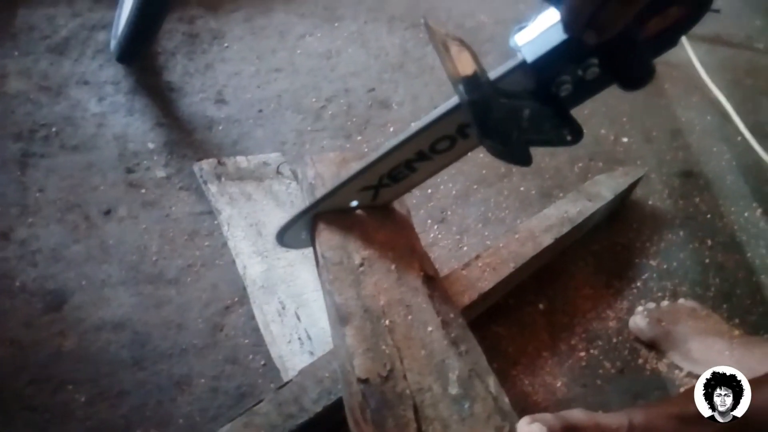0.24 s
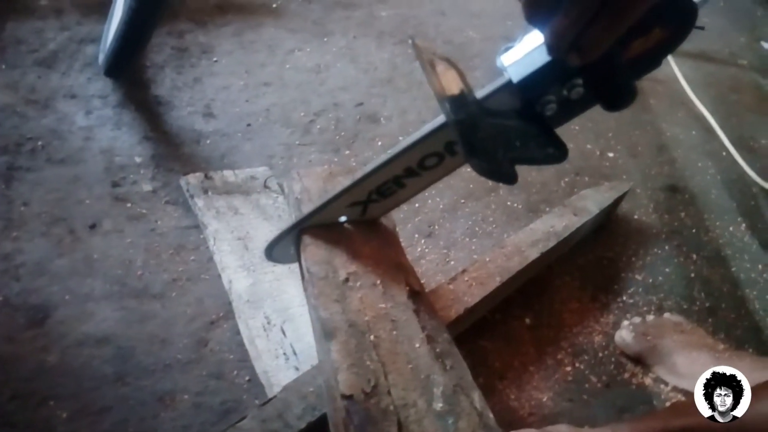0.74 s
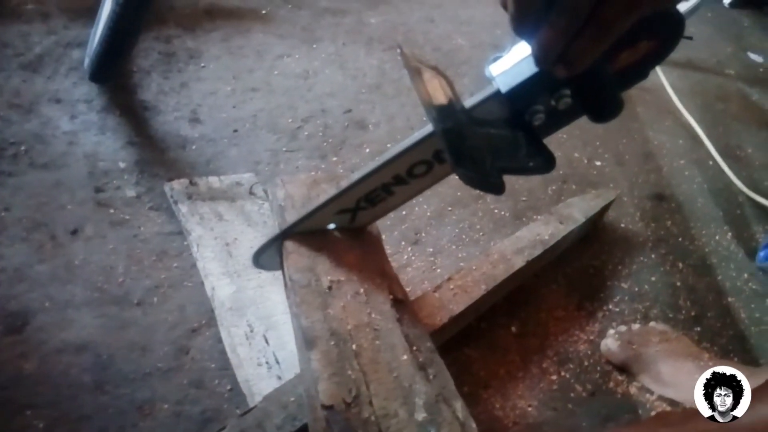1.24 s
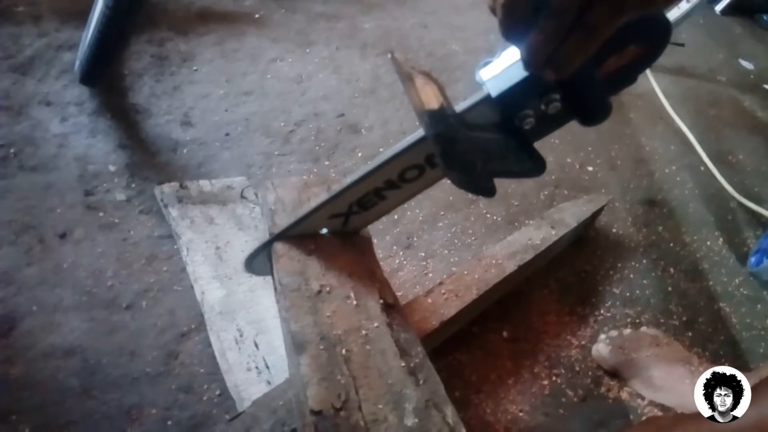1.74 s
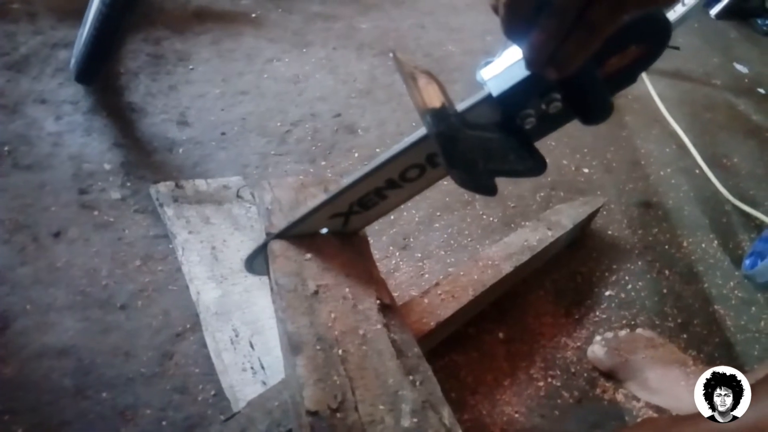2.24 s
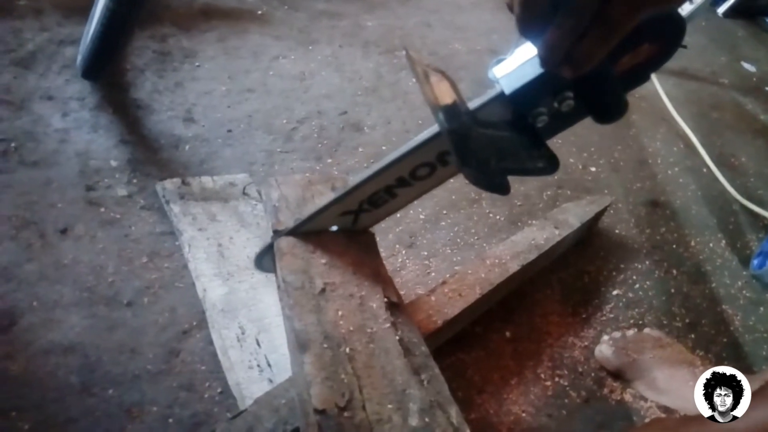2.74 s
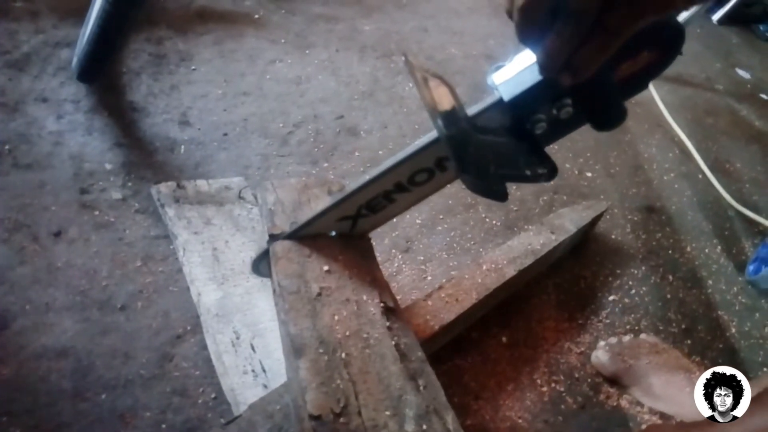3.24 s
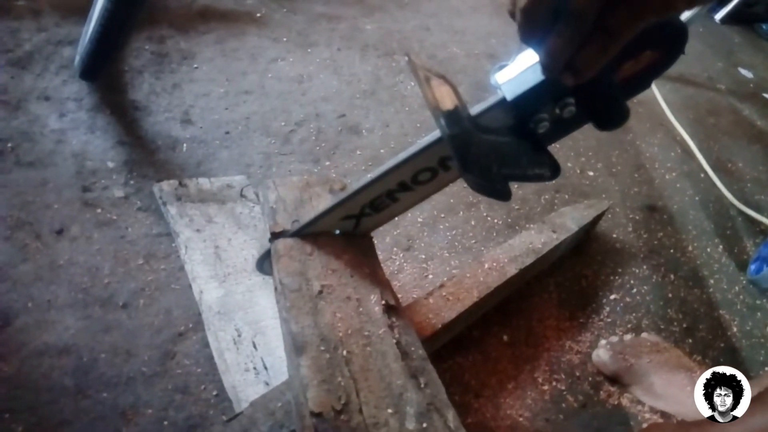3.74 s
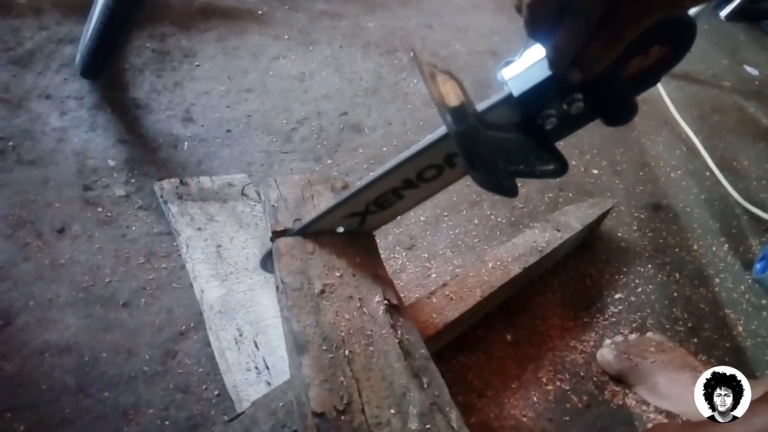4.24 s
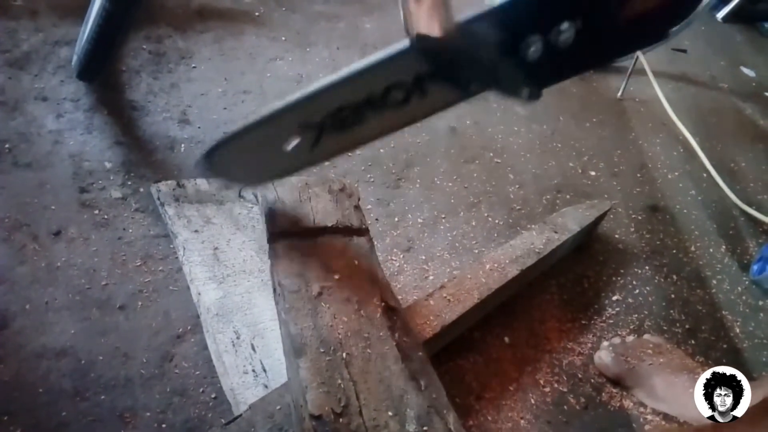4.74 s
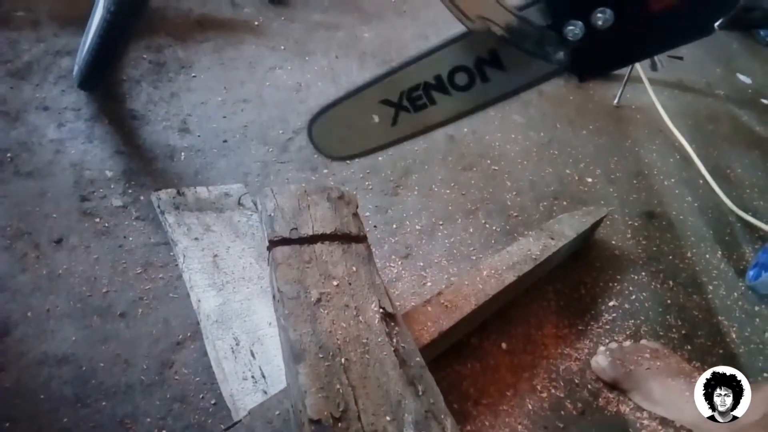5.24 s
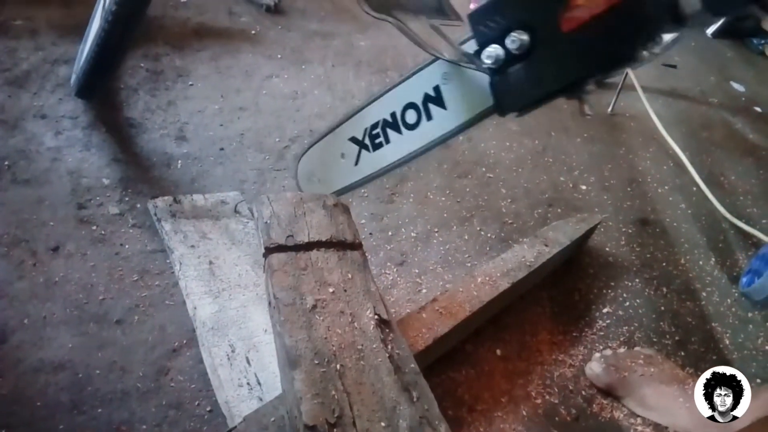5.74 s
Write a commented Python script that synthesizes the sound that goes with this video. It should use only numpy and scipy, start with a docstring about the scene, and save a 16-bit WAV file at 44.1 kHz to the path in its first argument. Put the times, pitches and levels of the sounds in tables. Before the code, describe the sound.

Close stereo pickup in a small hard-floored workshop: a grinder with a short chain bar cuts a wooden beam with a bright, rough, continuous metallic rattle and thin steel ringing. Blown air and sawdust thump on the right microphone. Near the end the saw lifts out, the thumping stops, and it whirs on, slightly faster and with clearer gear whine.

```python
"""An angle grinder fitted with a small chain bar saws into a wooden beam, lifts out and runs free,
speeding up a little as the load goes. Its chain is noise shaped by link blows, and the bar is
noise-driven resonance. The gears whine as tones locked to the spindle, and the deepening kerf
hoots faintly as a gliding narrow band. While it cuts, air and sawdust patter on the right
microphone port as showers of random impulses."""
import sys
import numpy as np
from scipy import signal
from scipy.fft import rfft, irfft, next_fast_len
from scipy.io import wavfile
from scipy.ndimage import uniform_filter1d, map_coordinates

SR = 44100
rng = np.random.default_rng(int(sys.argv[2]) if len(sys.argv) > 2 else 0)


def transcribe(signal):
    """Save signal, clipped to [-1, 1], as a 16-bit WAV file at the path in sys.argv[1]."""
    frames = np.atleast_2d(signal).T
    limited = np.clip(frames, -1, 1)
    pcm = np.round(limited * 32767).astype(np.int16)
    wavfile.write(sys.argv[1], SR, pcm)


N = 264600  # samples, six seconds


def amp(db):
    """Logarithmic level: decibels to amplitude gain."""
    return 10 ** (np.asarray(db) / 20)


def unit(x):
    """Energy normalisation: x at rms 1."""
    return x / np.sqrt(np.mean(np.abs(x) ** 2) + 1e-20)


def along(points, hz):
    """Logarithmic pitch scale: (Hz, value) points joined by lines on a log axis."""
    point_hz, values = np.transpose(points)
    return np.interp(np.log(hz + 1), np.log(point_hz + 1), values)


def curves(rows):
    """Linear interpolation in time: one value per sample for each column after the seconds."""
    seconds, *columns = np.transpose(rows)
    return [np.interp(np.arange(N) / SR, seconds, column) for column in columns]


def wobble(rate):
    """Band-limited random drift: a smooth curve through `rate` random knots a second."""
    knots = rng.standard_normal(int(N * rate / SR) + 4)
    return map_coordinates(knots, [np.arange(N) * rate / SR])


def swell_around(samples, middle_s, length_s):
    """Gaussian pulse: 1 at the middle, falling to exp(-2) at length_s on either side."""
    return np.exp(-2 * ((samples / SR - middle_s) / length_s) ** 2)


def filtered(x, response):
    """Linear filtering: the spectrum of x times a complex response of frequency."""
    size = 2 * next_fast_len(N // 2 + SR // 4)  # padded, so that tails do not wrap round
    hz = np.fft.rfftfreq(size, 1 / SR)
    return irfft(rfft(x, size) * response(hz), size)[..., :N]


def causal(points, hz):
    """Minimum phase: the folded cepstrum gives a causal response through (Hz, dB) points."""
    cepstrum = irfft(np.log(amp(along(points, hz))))
    half = len(cepstrum) // 2
    cepstrum[1:half] *= 2
    cepstrum[half + 1:] = 0
    return np.exp(rfft(cepstrum))


def resonate(x, modes):
    """Modal resonance: x through damped (Hz, width Hz, dB) modes of alternate sign, at rms 1."""
    def response(hz):
        total = 0
        for k, (centre, width, db) in enumerate(modes):
            damping = 1j * hz * width
            total = total + (-1) ** k * amp(db) * damping / (centre ** 2 - hz ** 2 + damping)
        return total
    return unit(filtered(x, response))


def impulses(times, sizes):
    """Impulse train: one spike of the given size at each time."""
    samples = np.clip(np.round(times * SR).astype(int), 0, N)
    return np.bincount(samples, sizes, N + 1)[:N]


# Speed of the spindle under load and free. Each row: time in seconds, speed in turns per second.
SPINDLE_SPEED = [(0, 128.6), (1.6, 122.2), (2.6, 129), (3.1, 133.6), (3.6, 132), (4.2, 134), (4.65, 147.5),
                 (5, 141.2), (5.3, 140.7), (5.7, 141.6), (6, 145)]


def spindle_speed():
    """Rotation rate: turns per second at every sample."""
    return curves(SPINDLE_SPEED)[0]


# How far the saw is out of the wood. Each row: time in seconds, share lifted out (0-1).
LIFT_OUT = [(0, 0.09), (4.3, 0.22), (4.8, 0.34), (5.2, 0.92), (6, 0.99)]


def lifted():
    """Unloading: the share of the saw that is out of the wood at every sample."""
    return curves(LIFT_OUT)[0]


# Hard slaps of the chain on the bar. Each row: middle in seconds,
# pressure level there in dB, before whip, roughness and normalisation.
CHAIN_SLAPS = [(0.015, 3.5), (0.096, 2), (0.196, 3.5), (0.282, 2), (0.31, 1.5), (0.382, 2.5), (0.464, 2.5),
               (0.503, 3.5), (0.581, 2.5), (0.655, 2.5), (0.791, 2.5), (0.874, 1.5), (0.953, 3.5),
               (1.05, 4.5), (1.116, 0.5), (1.156, 1.5), (1.34, 1.5), (1.439, 1), (1.484, 3), (1.563, 2),
               (1.593, 2), (1.786, 1.5), (1.862, 3), (1.963, 1.5), (2.115, 1), (2.14, 1), (2.227, 2.5),
               (2.275, 3), (2.332, 2.5), (2.384, 4.5), (2.419, 1), (2.539, 2.5), (2.588, 2), (2.643, 1.5),
               (2.769, 5), (3.031, 5), (3.155, 4.5), (3.236, 2.5), (3.284, 4), (3.335, 3), (3.38, 2),
               (3.463, 2), (3.58, 2), (3.673, 2), (3.703, 3.5), (3.749, 1.5), (3.793, 2), (3.888, 2.5),
               (4.07, 2.5), (4.175, 2), (4.282, 2), (4.372, 1.5), (4.417, 2.5), (4.732, 2.8), (4.952, 1),
               (5.028, 0.5), (5.258, 1.5), (5.388, 1.5), (5.94, 1), (5.99, 4)]
SLAP_S = 0.00975  # from the middle of a slap to exp(-2) of its grip on the level


def throb(turns, loop_db, half_loop_db, whip_db, rough_db, ceiling_db):
    """Periodic modulation: tight and slack runs of the loop press in turn, whip, and at times slap."""
    loops = turns * 6 / 37  # a sprocket of 6 teeth drives a loop of 37 links
    loop = 2 * np.pi * (loops + 0.0687 * wobble(3.126))
    whip = 2 * np.pi * (0.73 * turns + 0.325 * wobble(30))
    level_db = loop_db * np.cos(loop) + half_loop_db * np.cos(2 * loop) + 0.28 * wobble(24.954)
    level_db = ceiling_db * np.tanh(level_db / ceiling_db)
    for middle_s, db in CHAIN_SLAPS:
        start = max(0, round((middle_s - 3 * SLAP_S) * SR))
        near = np.arange(start, min(N, round((middle_s + 3 * SLAP_S) * SR)))
        contact = swell_around(near, middle_s, SLAP_S)
        level_db[near] += contact * (db - level_db[near])
    roughness_db = rough_db * np.tanh(wobble(170))
    return unit(amp(level_db + whip_db * np.cos(whip) + roughness_db))


def link_blows(turns, scatter_db, jitter_s, t60):
    """Impact excitation: each link hits the sprocket a little differently and its energy decays."""
    teeth = 6
    link = np.arange(int(turns[-1] * teeth))
    times = np.interp(link, turns * teeth, np.arange(N) / SR)
    times = times + jitter_s * rng.standard_normal(len(link))
    power = impulses(times, amp(scatter_db * rng.random(len(link))) ** 2)
    decay = amp(-60 * np.arange(SR // 20) / SR / t60) ** 2
    power = signal.fftconvolve(power, decay)[:N]
    return unit(np.sqrt(np.abs(power)))


def shifting(x, depth_db):
    """Modal selection: the contact points wander, so now one range of modes speaks, now another."""
    spectrum = signal.stft(x, nperseg=256)[2]
    field = rng.standard_normal(spectrum.shape[1:])
    field = uniform_filter1d(field, size=7, axis=0)  # smooth over frequency
    field = uniform_filter1d(field, size=5, axis=1)  # smooth over time
    return signal.istft(spectrum * amp(depth_db * unit(field)), nperseg=256)[1][:, :N]


# Workshop reverberation. Each row: frequency in Hz, time to fall by 60 dB in seconds.
ROOM_DECAY = [(200, 0.0565), (3000, 0.0757), (12000, 0.056)]


def room(x, wet_db, count=9):
    """Reverberant decay: floor and walls answer, changing as saw and microphone move."""
    wet = np.zeros((2, N))
    place = np.linspace(0, count - 1, N)
    for k in range(count):
        noise = rng.standard_normal((2, SR // 6))
        hz, t, spectrum = signal.stft(noise, SR, nperseg=256)
        decay = amp(-60 * t / along(ROOM_DECAY, hz)[:, None])
        tail = signal.istft(spectrum * decay, SR, nperseg=256)[1]
        near = np.sqrt(np.clip(1 - np.abs(place - k), 0, 1))  # equal-power crossfade
        wet += signal.oaconvolve(x * near, tail / np.linalg.norm(tail[0]), axes=1)[:, :N]
    return unit(x + amp(wet_db) * wet)


# Spectrum of the rattle at each port. Each row: frequency in Hz, relative level in dB.
LEFT_RATTLE = [(40, -108), (330, -102), (430, -94.5), (540, -89.5), (900, -84.5), (1020, -83.5),
               (1180, -78), (1450, -82.5), (1950, -80.5), (2180, -80), (2450, -77), (2950, -75),
               (3500, -76), (4300, -71.5), (5400, -71), (6200, -66), (6650, -68.5), (7200, -70.5),
               (7700, -77), (8600, -80.5), (11000, -87.5), (13600, -103), (14700, -95.5)]
RIGHT_RATTLE = [(40, -108), (330, -101), (600, -87), (940, -84), (1290, -76), (1720, -82), (2000, -78.5),
                (2200, -78.5), (2370, -73), (2760, -70), (3000, -67.5), (3450, -71.5), (3750, -70.5),
                (4000, -76), (4850, -77), (6100, -73.5), (7600, -82), (8400, -83.5), (11500, -86),
                (13700, -83), (14700, -80)]
# Likeness of the rattle at the two ports. Each row: frequency in Hz, correlation (-1 to 1).
PORT_LIKENESS = [(100, 0.97), (550, 0.82), (870, 0.405), (1050, 0.5), (1260, 0.93), (1550, -0.144),
                 (1950, 0.17), (2200, -0.304), (3000, -0.073), (3700, 0.19), (5000, -0.084), (6250, 0.363),
                 (7500, 0.023), (10000, -0.033)]
# Resonances of beam and bar under the biting teeth. Each row: frequency in Hz, width in Hz,
# relative level in dB.
BEAM_MODES = [(1392, 159, -10.5), (2011.5, 99, -7.5), (2416, 129, -0.5), (2623, 189, -0.5),
              (3652, 315, -5.5)]
# rattle: level in the cut, change once free, scale of its wandering (dB)
RATTLE_DB, RATTLE_FREE_DB, RATTLE_WANDER_DB = -35, 0.454, 0.0838
# hiss of the teeth: growth in dB per turn per second, scale of its wandering in dB
HISS_DB_PER_SPEED, HISS_WANDER_DB = 0.0067, 1.13


def chain(turns, pressure):
    """Impact and friction noise: links chatter and scrape along the bar as the teeth bite the beam."""
    lift, speed = lifted(), spindle_speed()
    blows = link_blows(turns, scatter_db=5.0, jitter_s=.0004, t60=0.01033)
    chatter = pressure * np.hypot(blows, .85)  # blows over a steady scrape
    force = shifting(chatter * rng.standard_normal((2, N)), depth_db=0.8)
    force = room(force, wet_db=-9)

    def mid_and_side(hz):
        angle = np.arccos(np.clip(along(PORT_LIKENESS, hz), -1, 1)) / 2
        return np.array([np.cos(angle), np.sin(angle)])

    def port_colour(hz):
        return amp([along(LEFT_RATTLE, hz), along(RIGHT_RATTLE, hz)])

    mid, side = filtered(force, mid_and_side)
    pair = unit(filtered(np.array([mid + side, mid - side]), port_colour))
    # the hiss of the teeth, above about 8.5 kHz, comes and goes
    treble = filtered(pair, lambda hz: 1 / (1 + (8500 / (hz + 1)) ** 10))
    treble_db = HISS_DB_PER_SPEED * (speed - speed.mean()) + HISS_WANDER_DB * wobble(9)
    level_db = RATTLE_DB + RATTLE_FREE_DB * lift + RATTLE_WANDER_DB * wobble(7.3)
    rattle = amp(level_db) * (pair + (amp(treble_db) - 1) * treble)
    bite = resonate(pressure * blows * rng.standard_normal((2, N)), BEAM_MODES)
    return rattle + (1 - lift) * amp([[-52], [-45]]) * bite


# Ringing of the bar. Each row: time in seconds, level in dB before port gains and wandering.
BAR_RING = [(0.0, -50.5), (0.9, -46), (1.45, -44), (2.6, -43), (2.95, -47), (3.3, -43), (3.8, -43),
            (4.8, -45), (6.0, -50)]
# Weaker modes of the bar while held in the cut. Each row: frequency in Hz, width in Hz,
# relative level in dB.
WEAK_BAR_MODES = [(2992, 92, -9), (4730, 160, -7.5), (5028, 59, 0), (5890, 150, 2), (6478, 192, 5.5)]


def bar(pressure):
    """Driven resonance: scraping keeps a sharp steel mode singing, with weaker ones and one far above."""
    ring_db, = curves(BAR_RING)
    low = resonate(rng.standard_normal(N), [(6106, 33, 0)]) * amp([[1.3], [-9]])
    high = resonate(rng.standard_normal((2, N)), [(14700, 290, 0)]) * amp([[-24], [-9]])
    others = resonate(rng.standard_normal((2, N)), WEAK_BAR_MODES) * amp([[-44], [-48.5]])
    ringing = amp(ring_db + 0.67 * wobble(14)) * (low + high)
    return pressure * (ringing + (1 - lifted()) * others)  # all shake with the chain


def tone(turns, flutter):
    """Random modulation of a carrier: a line of rms 1 that flutters differently at each port."""
    drift = np.array([1 + flutter * (wobble(30) + 1j * wobble(30)) for port in range(2)])
    return unit((drift * np.exp(2j * np.pi * turns)).real)


# Tones of the drive. Each row: multiple of spindle speed, level in dB in the cut,
# level in dB running free, left minus right in dB.
DRIVE_TONES = [(4, -73, -73.5, 5.5), (8.96, -67, -62.5, 3), (11.97, -66, -59.5, 5.5)]
# Hum of the rotor, which comes through as the free saw is turned. Each row: time in seconds,
# level in dB of its octave before port gains, level in dB of its fundamental.
ROTOR_HUM = [(0, -78, -82), (4.65, -77, -85.5), (4.85, -68, -86.5), (5.2, -68, -81), (5.4, -65, -73.5),
             (5.6, -62, -71), (6, -63.5, -71)]
# Gear-mesh whistles, which beam past the microphone as the saw is turned. Each row: time in seconds,
# levels in dB at 36 and at 40 times spindle speed, both before port gains.
MESH_WHISTLES = [(0, -62.5, -70.5), (4.4, -60.5, -83.5), (4.7, -66.5, -77), (4.95, -48.5, -56.5),
                 (5.15, -57, -48.5), (5.4, -55, -56), (5.52, -57, -60), (5.65, -51, -79), (6, -56, -66.5)]
# Resonances of the gear housing, bared when the saw lifts. Each row: frequency in Hz, width in Hz,
# relative level in dB.
HOUSING_MODES = [(604, 109.8, -26.5), (1153, 209, -10.5), (1687, 130, -6), (2984, 120, -0.5),
                 (3230, 138, 2.5), (3510, 436, -6)]


def gears(turns):
    """Rotational harmonics: drive tones follow the spindle; the housing resonates as the saw lifts."""
    lift = lifted()
    octave_db, rotor_db = curves(ROTOR_HUM)
    turns = turns + 0.0112 * wobble(25) + 0.0384 * wobble(7)  # slight unsteadiness of pitch
    rotor = turns * 36 / 11  # the rotor is geared down to the spindle
    hum = amp(octave_db) * tone(2 * rotor, flutter=0.69) * amp([[-4], [0]])
    hum += amp(rotor_db) * tone(rotor, flutter=0.5)
    whine = np.zeros((2, N))
    for order, cut_db, free_db, pan_db in DRIVE_TONES:
        port_db = np.array([[pan_db], [-pan_db]]) / 2
        level_db = cut_db + lift * (free_db - cut_db) + port_db
        whine += amp(level_db) * tone(order * turns, flutter=1.0)
    mesh36_db, mesh40_db = curves(MESH_WHISTLES)
    whine += amp(mesh36_db) * tone(36 * turns, flutter=1.63) * amp([[3.5], [-3.5]])
    whine += amp(mesh40_db) * tone(40 * turns, flutter=1.4) * amp([[5], [-6]])
    housing = resonate(rng.standard_normal((2, N)), HOUSING_MODES)
    return hum + whine + lift * amp([[-49], [-43]]) * housing


# Air resonance of the kerf. Each row: time in seconds, frequency in Hz, level in dB.
KERF_RESONANCE = [(0, 865.3, -73), (0.55, 845, -72.5), (0.78, 830, -64.5), (1.0, 827, -72.5),
                  (1.7, 741.4, -72), (2.05, 703, -59.5), (2.4, 690, -73), (2.62, 675.6, -65.5),
                  (2.75, 671, -60), (2.9, 661.6, -66), (3.2, 646.7, -67), (3.4, 624.3, -73),
                  (3.7, 595.7, -63.5), (3.87, 589.3, -71), (4.05, 582, -63), (4.4, 566, -78.5)]


def kerf():
    """Cavity resonance: the slot in the wood hoots breathily, lower as it deepens."""
    hz, db = curves(KERF_RESONANCE)
    breath = wobble(65) + 1j * wobble(65)
    hoot = breath * np.exp(2j * np.pi * np.cumsum(hz) / SR)
    return amp(db) * unit(hoot.real)


def dust(count):
    """Shot noise: grains landing at random moments, at rms 1."""
    sizes = rng.choice([-1, 1], count) * amp(-20 * rng.random(count))
    return unit(impulses(rng.uniform(0, N / SR, count), sizes))


def even(x, span_s):
    """Short-time levelling: the flow is held steady over each span, though its grains are not."""
    power = uniform_filter1d(x ** 2, size=int(span_s * SR), axis=-1)
    return x / np.sqrt(np.abs(power) + 0.025)


# Stream of air and sawdust on the port. Each row: time in seconds, level in dB
# before lulls, flutter and port gains.
DUST_STREAM = [(0.0, -51), (0.48, -54), (0.56, -58), (0.64, -53.5), (1.0, -54.5), (1.5, -50), (1.58, -56.5),
               (2.3, -55), (2.44, -60.5), (2.54, -61.5), (2.92, -53.5), (3.04, -57.5), (3.85, -54),
               (4.19, -58.5), (4.3, -54), (4.8, -56.5)]
# Lulls in which the stream misses the port. Each row: middle in seconds,
# time from there to exp(-2) of the dip in seconds, change at the middle in dB.
STREAM_LULLS = [(0.56, 0.026, -9), (1.262, 0.0244, -6), (1.541, 0.015, -6), (1.975, 0.0125, -6.5),
                (2.345, 0.012, -1), (2.429, 0.029, -6.5), (3.04, 0.0212, -6), (3.6, 0.0127, -8),
                (3.933, 0.022, -11), (4.206, 0.0206, -14)]
# Puffs of sawdust knocking on the port. Each row: middle in seconds, time from there to exp(-2)
# of the swell in seconds, soft thump in dB, hard grit in dB, both before port gains.
DUST_PUFFS = [(0.01, 0.0137, -46.5, -52.5), (0.062, 0.021, -45.5, -46), (0.093, 0.0154, -43.5, -56),
              (0.138, 0.0162, -45.5, -53.5), (0.229, 0.0117, -44, -57), (0.31, 0.018, -50, -57.5),
              (0.392, 0.025, -48, -52.5), (0.469, 0.0366, -46.5, -55), (0.728, 0.0184, -50.5, -48),
              (0.798, 0.0215, -48.5, -51.5), (0.961, 0.0097, -54.5, -63.5), (1, 0.058, -47, -47.5),
              (1.069, 0.023, -46.5, -56), (1.168, 0.033, -48, -47.5), (1.201, 0.0173, -46, -46),
              (1.284, 0.013, -46, -46.5), (1.352, 0.015, -48.5, -50), (1.488, 0.022, -49, -42.5),
              (1.627, 0.0163, -47.5, -63), (1.667, 0.015, -46.5, -45.5), (1.724, 0.0113, -44, -45),
              (1.818, 0.016, -56, -47.5), (1.862, 0.029, -46, -45.5), (1.939, 0.026, -48.5, -48.5),
              (2.018, 0.021, -46, -46), (2.139, 0.058, -48, -49.5), (2.271, 0.033, -50.5, -48),
              (2.316, 0.0238, -51, -47), (2.391, 0.0223, -51, -46.5), (2.534, 0.0574, -49, -60),
              (2.624, 0.0205, -50, -55.5), (2.687, 0.046, -50.5, -49), (2.771, 0.0156, -46, -48),
              (2.867, 0.044, -46, -47.5), (2.935, 0.02, -41.5, -48), (2.992, 0.044, -53, -49),
              (3.081, 0.0163, -46, -46.5), (3.121, 0.023, -58, -45.5), (3.181, 0.0097, -48.5, -58.5),
              (3.261, 0.057, -49, -53), (3.348, 0.0317, -46.5, -50), (3.402, 0.022, -47, -47.5),
              (3.484, 0.0138, -47.5, -46.5), (3.646, 0.0166, -47.5, -41), (3.75, 0.05, -62, -48.5),
              (3.785, 0.026, -50, -50.5), (3.841, 0.0178, -49.5, -68), (3.897, 0.02, -53.5, -49.5),
              (4.017, 0.0185, -47, -46.5), (4.179, 0.012, -48, -53.5), (4.258, 0.017, -44, -49),
              (4.322, 0.0192, -53, -42.5), (4.399, 0.018, -55, -50), (4.546, 0.0206, -53.5, -46.5),
              (4.6, 0.019, -45, -46), (4.624, 0.022, -53.5, -67.5), (4.713, 0.017, -50.5, -64),
              (4.752, 0.032, -49.5, -52.5)]
# Response of the port to touch. Each row: frequency in Hz, relative level in dB.
PORT_TOUCH = [(20, -45), (50, -12.5), (90, -1.5), (220, 1.5), (400, -5), (700, -16), (1100, -20.5),
              (2500, -34.5), (8000, -63.5)]
# Colour of the hard grit. Each row: frequency in Hz, relative level in dB.
GRIT_COLOUR = [(40, -34), (200, -8.5), (380, 0), (560, -1), (800, -4.5), (1300, -18), (3000, -33.5),
               (8000, -57.5)]
# Largest chips striking the port. Each row: start in seconds, peak in dB before port gains,
# pitch of the thud in Hz.
LARGE_CHIPS = [(0.053, -35.5, 274), (0.95, -36.5, 202), (0.998, -43.5, 257), (1.512, -33.5, 402),
               (1.843, -48, 187), (2.005, -38.5, 254), (2.139, -43.5, 294), (2.763, -43.5, 234),
               (2.924, -39, 285), (3.113, -38, 336), (3.392, -39, 476), (3.486, -38, 275.5),
               (3.645, -41, 276.1), (4.253, -37.5, 315), (4.313, -40.5, 372), (4.598, -36.5, 244)]
EXIT_S, EXIT_FADE_S = 4.825, 0.0285  # the stream swings off the port: when and how fast, seconds
FLUTTER_DB, FLUTTER_RATE = 5, 50  # greatest flutter either way, random knots a second


def sawdust():
    """Granular impact: air, dust and chips thud on the right port, barely on the left, while it cuts."""
    stream_db, = curves(DUST_STREAM)
    aimed, = curves([(EXIT_S, 1), (EXIT_S + EXIT_FADE_S, 0)])
    lull_db = sum(db * swell_around(np.arange(N), middle_s, length_s)
                  for middle_s, length_s, db in STREAM_LULLS)
    flutter_db = FLUTTER_DB * np.tanh(wobble(FLUTTER_RATE))
    stream = aimed * amp(stream_db + lull_db + flutter_db)
    thump_power, grit_power = stream ** 2, (amp(-6.5) * stream) ** 2
    for middle_s, length_s, thump_db, grit_db in DUST_PUFFS:
        start = max(0, round((middle_s - 2 * length_s) * SR))
        near = np.arange(start, round((middle_s + 2 * length_s) * SR))
        swell = swell_around(near, middle_s, length_s)
        thump_power[near] += (amp(thump_db) * swell) ** 2
        grit_power[near] += (amp(grit_db) * swell) ** 2
    landing = np.array([dust(count=2500), dust(count=2500)]) + 0.55 * rng.standard_normal((2, N))
    soft = even(unit(filtered(landing, lambda hz: causal(PORT_TOUCH, hz))), span_s=0.0376)
    grit = even(unit(filtered(dust(count=1800), lambda hz: causal(GRIT_COLOUR, hz))), span_s=0.03)
    patter = np.sqrt(thump_power) * soft * amp([[-23], [0.2]])
    patter += np.sqrt(grit_power) * grit * amp([[-27], [-0.3]])
    return patter + chip_thuds() * amp([[-32.5], [0.3]])


def chip_thuds():
    """Damped membrane motion: each chip pushes the membrane in, it springs back, its velocity sounds."""
    thuds, t = np.zeros(N + SR), np.arange(SR // 25) / SR
    for start_s, db, hz in LARGE_CHIPS:
        cycles = hz * t
        dent = np.sin(np.pi * cycles) ** 2 * np.exp(-1.8 * cycles)
        push = np.gradient(dent)
        thud = amp(db) * push / push.max() * rng.choice([-1, 1])
        thuds[round(start_s * SR):][:len(t)] += thud
    return thuds[:N]


def scene():
    """Superposition: chain, bar, gears, kerf and dust add, the moving parts led by the spindle."""
    turns = np.cumsum(spindle_speed()) / SR
    pressure = throb(turns, loop_db=0.62, half_loop_db=0.72, whip_db=0.5655, rough_db=0.79, ceiling_db=1.5)
    return chain(turns, pressure) + bar(pressure) + gears(turns) + kerf() + sawdust()


TOP_HZ = 15600  # band limit


def record(dry):
    """Band limitation: a very steep low-pass keeps nothing above the limit."""
    return filtered(dry, lambda hz: 1 / (1 + (hz / TOP_HZ) ** 500))


dry = scene()
out = record(dry)
transcribe(out)
```